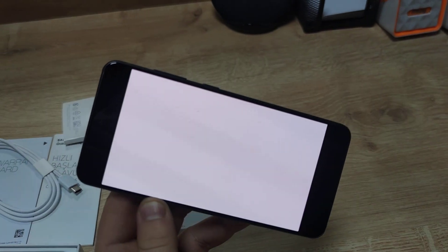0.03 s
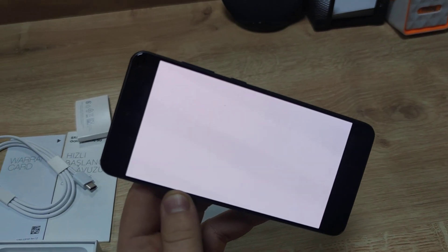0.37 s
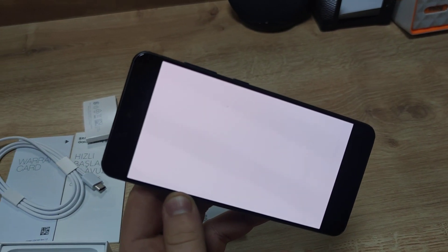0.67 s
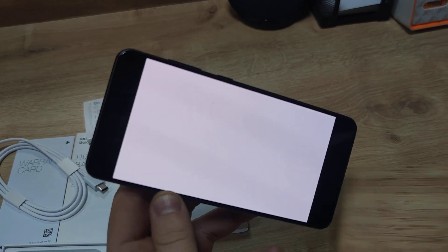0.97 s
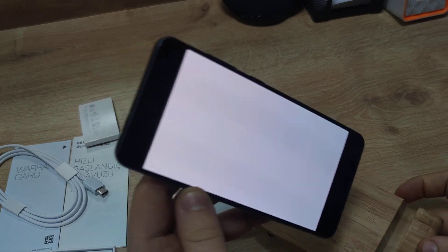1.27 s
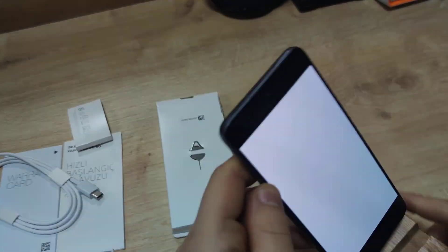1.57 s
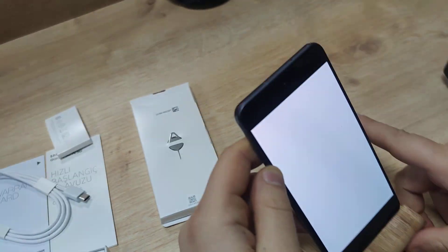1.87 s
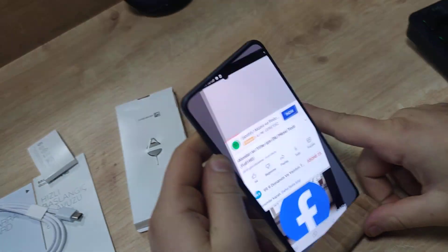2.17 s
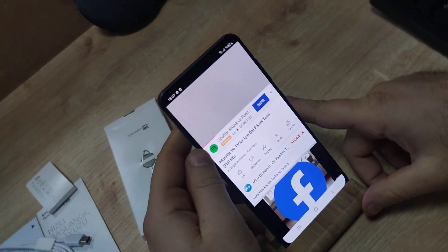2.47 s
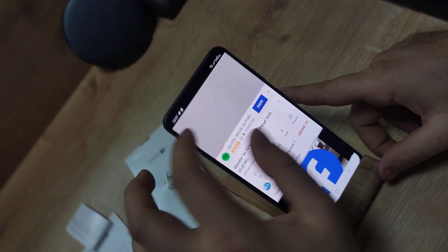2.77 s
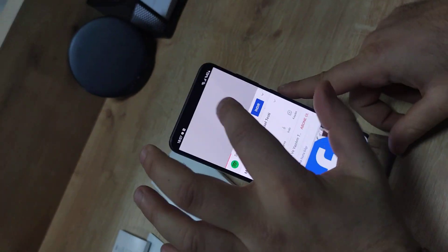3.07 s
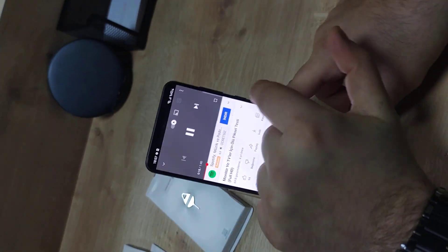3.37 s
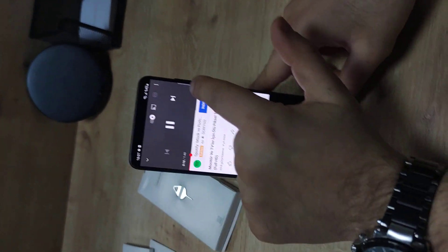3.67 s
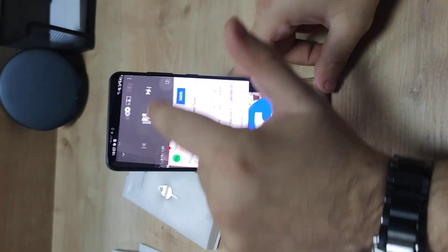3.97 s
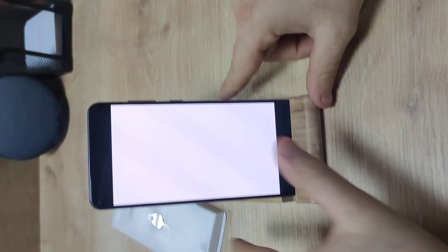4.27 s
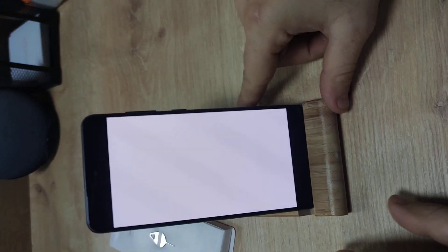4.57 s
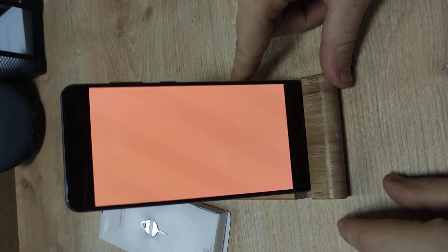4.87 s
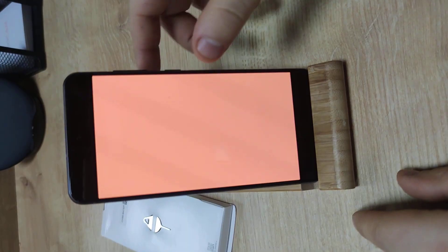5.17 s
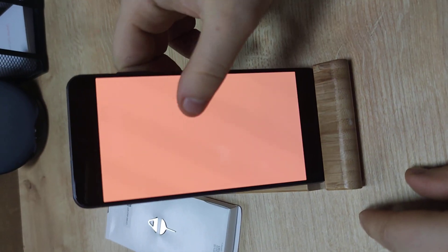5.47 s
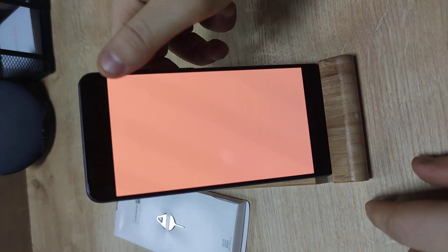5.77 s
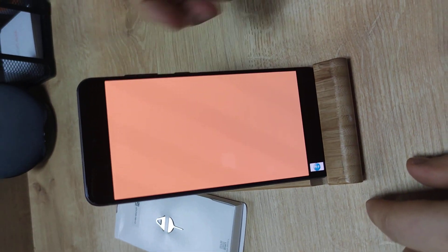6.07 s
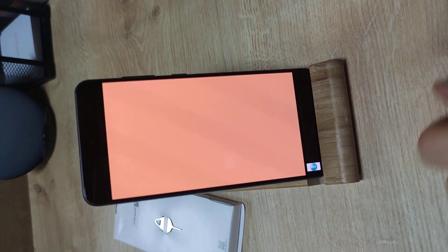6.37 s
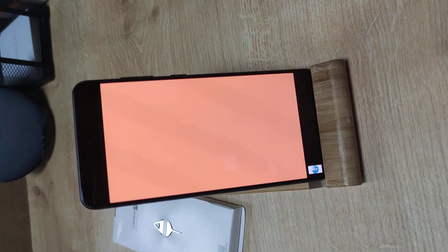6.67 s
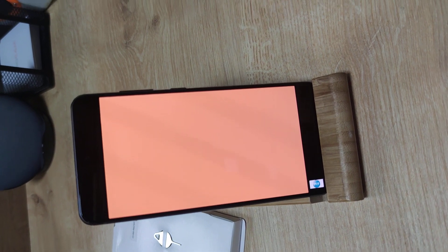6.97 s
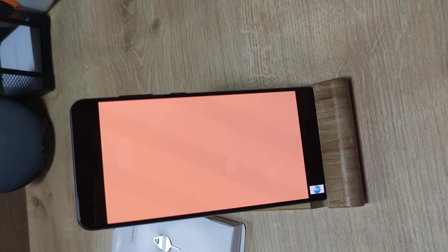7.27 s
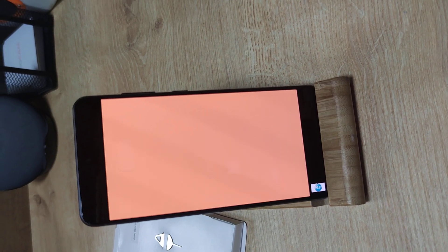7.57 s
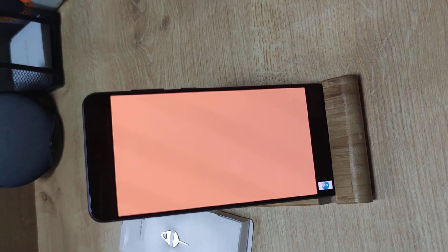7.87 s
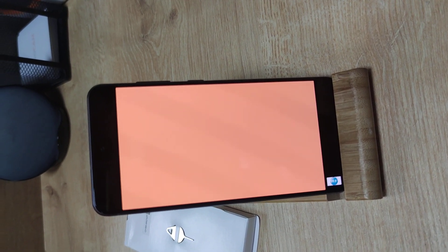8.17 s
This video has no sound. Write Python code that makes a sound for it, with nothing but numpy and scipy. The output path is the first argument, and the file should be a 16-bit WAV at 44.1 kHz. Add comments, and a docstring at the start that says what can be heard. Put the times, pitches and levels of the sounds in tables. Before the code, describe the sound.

Wooden knocks and clicks of a smartphone being set in a desk stand, followed by close bumps and rubbing from handling the microphone.

```python
"""Setting a phone in its stand

In a small room a wooden stand knocks onto a desk, a steel watch band jingles, and a
smartphone clicks into the stand. The hand holding the camera shifts its grip: skin hisses
over the casing, and a finger rubs the right microphone port and pumps the air inside it.
A sleeve brushes the desk as the hands withdraw. Still air and a faint whine lie underneath."""
import sys
import numpy as np
from scipy import signal
from scipy.fft import rfft, irfft
from scipy.io import wavfile
from scipy.ndimage import uniform_filter1d

SR = 44100
rng = np.random.default_rng(int(sys.argv[2]) if len(sys.argv) > 2 else 0)


def int16_out(signal):
    """Quantize to a 16-bit WAV file."""
    q = np.round(np.clip(np.atleast_2d(signal).T, -1, 1) * 32767)
    wavfile.write(sys.argv[1], SR, q.astype(np.int16))


N = 371272
T = np.arange(N) / SR

# The room's still air. Each row: frequency in Hz, level in dB.
AIR_SPECTRUM = [(12, -42.5), (20, 3), (45, -3.5), (91, -14.5), (216, -20.5), (285, -16.5), (319, -15.5),
                (399, -17.5), (642, -29), (698, -25.5), (1570, -35), (2530, -32), (2990, -39),
                (13500, -46.5), (16000, -42)]
# Electronic whine on the left. Each row: pitch in Hz, level in dB.
WHINE_PARTIALS = [(2272, -72.5), (4544, -79)]
# The hand's slide over the casing. Each row: time in seconds, left and right levels in dB.
SLIDE_LEVELS = [(0, -64, -74), (1.4, -65, -83), (1.8, -54.5, -54), (2.4, -61, -65), (3.0, -53.5, -52),
                (3.76, -65, -80.5), (3.88, -58.5, -51), (4.15, -51.5, -47.5), (4.42, -44, -39.5),
                (4.69, -42.5, -49), (4.715, -40, -36), (4.96, -52.5, -43.5), (5.15, -48.5, -37),
                (5.45, -55, -51), (5.68, -61, -49.5), (5.9, -66.5, -61), (6.4, -57, -52),
                (6.75, -70.5, -62), (7.06, -61.5, -55), (7.4, -71, -64), (8.42, -66.5, -60)]
# Sliding skin as each port colours it. Each row: frequency in Hz, level in dB.
LEFT_PORT_SPECTRUM = [(40, 14), (200, -15.5), (600, -1), (2300, -5), (4000, -11.5), (6500, -10.5),
                      (7500, -3), (8100, 1.5), (8900, -7.5), (11000, -15.5), (16000, -22)]
RIGHT_PORT_SPECTRUM = [(30, 25), (100, 2), (300, -3), (700, -1), (2400, -5), (3400, -15), (6000, -11),
                       (8000, -68), (10500, -18), (12500, -5), (13700, -1.5), (16000, -16)]
# Light taps near the left port. Each row: time in seconds, level in dB, pulse width in ms.
CASING_TAPS = [(2.5176, -23.5, 0.13), (3.072, -26, 0.49), (7.2375, -18, 3.15)]
# Cloth on wood. Each row: frequency in Hz, level in dB.
CLOTH_SPECTRUM = [(40, -18), (90, 5.5), (130, -8), (200, 17), (300, 2), (800, 0.5), (1100, -0.5),
                  (1550, -2), (2700, -2), (3500, -16), (6000, -17.5), (8500, -19), (11000, -45),
                  (16000, -37)]
# Sleeve sweeps. Each row: start, hold and 60 dB fade time in seconds, level and treble in dB.
SLEEVE_SWEEPS = [(0, 0.034, 0.41, -47.5, -11), (1.633, 0.44, 3.2, -53.5, 4),
                 (6.06, 0.061, 0.3, -65.5, 11.5), (6.441, 0.034, 0.47, -44.5, 14),
                 (6.504, 0.015, 0.24, -37.5, 0.5), (6.898, 0.05, 0.094, -50, 4.5),
                 (6.942, 0.035, 0.042, -43.5, -2.5)]
# Fingers and objects sliding. Each row: centre time in seconds, level in dB, length in seconds,
# resonance and its width in Hz, left minus right in dB.
SHORT_SLIDES = [(.03, -62.5, .08, 190, 118, 1), (1.071, -47, 0.065, 7250, 2980, 9),
                (1.033, -42.5, 0.017, 1786, 2010, 1), (1.074, -30, 0.015, 2290, 2500, -4),
                (1.087, -33.5, 0.032, 1040, 200, -1), (2.766, -54.5, 0.026, 6480, 4000, -18),
                (2.879, -62, 0.1, 6160, 4000, -19), (3.058, -44, 0.016, 2420, 1800, -32.5),
                (4.749, -60, 0.094, 2240, 1710, -12), (4.357, -51, 0.28, 190, 200, -3),
                (4.419, -59.5, 0.38, 1870, 1310, -13), (4.748, -50.5, 0.12, 5600, 4000, 3),
                (5.224, -52, 0.043, 1220, 700, 3), (6.019, -53.5, 0.044, 230, 298, 3),
                (6.086, -51.5, 0.049, 1360, 594, -2), (6.513, -47.5, 0.12, 89, 50, 4),
                (6.56, -49, 0.26, 190, 70, 0), (6.53, -43, .03, 2200, 1800, -1),
                (6.952, -50.5, .006, 7360, 5000, 11), (6.955, -38, 0.036, 756, 448, -1.5)]
# Knocks on stand and desk. Each row: start in seconds, level in dB, contact cut-off in Hz,
# thud and click trims in dB.
STAND_KNOCKS = [(0.166, -34.5, 2180, 0.5, -3), (1.127, -2, 1800, -13, -19.5), (1.217, -23, 1470, -24, -39),
                (1.336, -51.5, 200, 3, -41), (1.5177, -11, 3050, -17, -9.5), (1.54, -18.5, 2500, -9, -17),
                (1.635, -25, 1760, -10, -18), (1.684, -37.5, 1500, 2.5, -19), (1.738, -29.5, 2200, -3, -18),
                (1.785, -35.5, 1200, -2, -18), (1.742, -17, 2430, -23.5, -14.5),
                (1.837, -34.5, 1580, 0, -9), (1.862, -32, 1300, -6, -31), (1.896, -34, 2000, -3, -15),
                (1.919, -25, 1800, -12.5, -13.5), (2.0167, -16, 2840, -36.5, -16),
                (2.0586, -12, 2920, -17, 7), (2.064, -19, 3530, -2.5, 8.5), (2.078, -20.5, 1980, 4, -3)]
# A knock's wooden body, desk thud and hard click. Each row: frequency in Hz, level in dB.
WOOD_SPECTRUM = [(60, -28.5), (150, -9.5), (300, -1), (500, -6), (750, 5.5), (1100, -1.5), (1400, -6),
                 (1750, 0.5), (2650, -9.5), (3200, -18.5), (6000, -37), (16000, -48)]
THUD_SPECTRUM = [(30, -25.5), (70, -11), (110, -6), (240, -6), (360, -1.5), (500, -12.5), (900, -42),
                 (16000, -67)]
CLICK_SPECTRUM = [(300, -34), (2000, 9.5), (3300, 6), (4300, 0), (5500, -1.5), (8300, -10), (9600, -28),
                  (16000, -36)]
# The ring of stand and desk, and of the phone's frame.
# Each row: pitch in Hz, level in dB, 60 dB decay time in seconds.
STAND_MODES = [(243, -11, .06), (357, -13.5, 0.36), (450, -15, 0.075), (562, 19, 0.023), (643, 5, 0.12),
               (712, 0.5, .12), (830, 11, 0.035), (1064, -7, 0.17), (1454, 6, 0.028), (1470, -19.5, 0.069),
               (1700, -12, 0.19), (1950, -13.5, 0.014), (2236, -7, 0.013), (2560, 1, 0.06)]
PHONE_MODES = [(2540, -2, 0.068), (3040, 3, 0.059), (4120, 7, 0.03), (5220, -8, 0.035), (5680, -22, 0.032)]
# Watch band jingles. Each row: start in seconds, level in dB, clasp trim in dB.
BAND_JINGLES = [(1.029, -37.5, 8.5), (1.046, -20, -12.5), (1.0607, -25.5, -2), (1.065, -23.5, -8),
                (1.07, -23.5, -3.5), (1.0848, -27, -8.5)]
# The tick of one link. Each row: frequency in Hz, level in dB.
TICK_SPECTRUM = [(700, -7.5), (1200, -20), (2400, -8), (4000, -7.5), (5600, -8), (7400, 7), (9000, -1.5),
                 (11000, -10), (16000, -28)]
# The ring of links and clasp. Each row: pitch in Hz, level in dB, 60 dB decay time in seconds.
BAND_LINK_MODES = [(6740, 6.5, 0.038), (7240, 7, 0.045), (7260, -5, .1), (7440, -6, 0.049),
                   (7800, 5, 0.045), (8200, -20, .03), (13200, -2, 0.024)]
BAND_CLASP_MODES = [(1100, 3, 0.079), (1475, -16, 0.022), (2050, -14, .015), (2280, 14, .025),
                    (2750, -25, 0.011), (3800, -24, 0.011)]
# Skin rubbing the covered port. Each row: frequency in Hz, level in dB.
SKIN_SPECTRUM = [(25, 6), (100, 9), (300, 2.5), (700, -3), (1500, -7), (2600, -12), (3500, -18.5),
                 (6200, -19.5), (7800, -37.5), (10000, -35.5), (13000, -26.5), (16000, -35.5)]
# Rubs across the right port. Each row: start, length and attack in seconds, level in dB,
# opening and closing gain of each treble shelf in dB.
PORT_RUBS = [(2.542, 0.93, 0.014, -63, 14, 9), (2.914, 0.073, 0.033, -31.5, 15, 11.5),
             (2.973, 0.088, 0.013, -22.5, 8, -4), (3.105, 0.0855, 0.011, -14.5, 4.5, -1.5),
             (3.304, 0.066, 0.0025, -18.5, -2.5, -1.5), (3.429, 0.03, 0.0088, -36, -14, -28)]
# The resting finger creeps between rubs. Each row: time in seconds, level in dB.
CREEP_LEVELS = [(2.85, -68), (3.08, -44), (3.3, -48), (3.74, -56), (3.82, -93)]
# Fingertip bumps on the right port. Each row: time in seconds, "press" or "lift", level in dB,
# pulse width in ms, grit trim in dB, contact in ms, air pocket pitch in Hz, its ring trim in dB.
PORT_BUMPS = [(2.768, "lift", -36.5, 2.5, -10.5, 7.8, 180, -12),
              (3.067, "press", -15, 1.5, -27, 12, 300, -11),
              (3.0893, "press", -10.5, 0.11, -17, 6, 190, -2), (3.098, "press", -11, 3.5, -30, 14, 190, 0),
              (3.107, "press", -1, 0.61, -19, 3.3, 600, -15),
              (3.2131, "lift", -15.5, 0.48, -24, 8, 360, -5),
              (3.2183, "press", -1, 0.37, -26.5, 14, 1020, -24),
              (3.223, "lift", -4.5, 0.58, -33, 14.6, 180, -7),
              (3.256, "press", -3, 0.28, -22.5, 7.2, 304, -2),
              (3.2906, "press", -5, 0.45, -16, 3.6, 282, 1),
              (3.3086, "lift", 0.5, 0.32, -20, 3.2, 1400, -13.5),
              (3.319, "lift", -9, 0.94, -21, 5, 378, -3), (3.3643, "press", -5, 0.81, -49, 10, 315, -7),
              (3.4697, "lift", -1, 0.4, -24, 10.5, 430, -11.5),
              (3.473, "lift", -0.5, 0.5, -27, 11, 381, -2),
              (3.5256, "press", -30.5, 1, -4.5, 1.9, 220, -12),
              (3.557, "lift", -25.5, 0.35, -10.5, 3.2, 700, -17),
              (3.5642, "lift", -11.5, 0.76, -27, 1.94, 400, -24),
              (3.6046, "lift", -17, .54, -12, 8.9, 277, 4),
              (3.6129, "lift", -13.5, 0.64, -33, 2.5, 370, -15),
              (3.624, "lift", 0.5, 0.58, -20.5, 5.3, 1070, -13),
              (3.692, "lift", -27.5, .2, -2.5, 3.1, 580, 1),
              (3.7018, "lift", -6.5, 1.2, -16, 4.9, 310, -4.5),
              (3.707, "lift", -1.5, 1.22, -24.5, 13.2, 520, -6.5),
              (3.7364, "lift", -8, 1, -26, 3.9, 316, -5.5),
              (3.843, "press", -31.5, 0.17, -11.5, 9.9, 650, -10),
              (3.868, "press", -28, 2.5, -19.5, 17, 1110, -10),
              (3.998, "press", -13.5, 0.49, -35, 5.5, 350, 0.5),
              (4.0021, "press", -12, 2.2, -33, 6.5, 580, -2.5),
              (4.0197, "press", -21.5, 0.093, -26, 15, 174, -3),
              (4.2282, "press", -15, 0.22, -18.5, 1.7, 330, -11.5),
              (4.3982, "press", -20, .76, -13.5, 6.6, 970, -8),
              (4.583, "press", -16.5, 0.21, -12, 2.6, 340, 1.5),
              (4.602, "lift", -6, 1.2, -9.5, 4.5, 475, -7), (4.6116, "lift", 1, 1.7, -26, 8.4, 557, -11),
              (4.8902, "press", -26.5, 1.2, -17, 6.5, 179, -9),
              (5.1447, "press", -27, .1, -6, 9.1, 500, -6),
              (5.1509, "lift", -3.5, 0.046, -35.5, 8.6, 248, -30),
              (5.348, "press", -17, 0.15, -3, 2.2, 1400, -27),
              (5.3605, "lift", .5, 0.62, -29, 10.7, 255, -11.5),
              (5.4186, "press", -27, 0.33, 0.5, 5.9, 800, -22),
              (5.424, "lift", -.5, .61, -36.5, 10, 547, -18),
              (5.5423, "press", -35, 1.5, -11.5, 5.9, 300, -14),
              (5.6222, "press", -36.5, 0.089, -10.5, 10, 756, -1)]


def undb(db):
    """Decibels to gain."""
    return 10 ** (np.asarray(db) / 20)


def unit(x):
    """Scale to rms 1."""
    return x / np.sqrt(np.mean(x ** 2))


def curves(rows):
    """Each column of a table as a line through time."""
    times, *columns = np.transpose(rows)
    return [np.interp(T, times, column) for column in columns]


def add(out, start_s, x):
    """Mix x in at start_s."""
    i = max(int(start_s * SR), 0)
    out[..., i:i + x.shape[-1]] += x[..., :N - i]


def colour(x, spectrum, size=4096):
    """Minimum-phase EQ of unit energy, drawn through (Hz, dB) points."""
    hz, db = np.transpose(spectrum)
    bins_hz = np.maximum(np.arange(size // 2 + 1) * SR / size, 1)
    gains = undb(np.interp(np.log(bins_hz), np.log(hz), db))
    cepstrum = irfft(np.log(gains))
    cepstrum[1:size // 2] *= 2
    cepstrum[size // 2 + 1:] = 0
    impulse = irfft(np.exp(rfft(cepstrum)))
    impulse /= np.linalg.norm(impulse)
    return np.apply_along_axis(lambda row: signal.oaconvolve(row, impulse)[:len(row)], -1, x)


def cut(x, hz, kind, order=2):
    """Low-pass or high-pass."""
    return signal.sosfilt(signal.butter(order, hz, kind, fs=SR, output="sos"), x)


def brighten(x, treble_db, hz):
    """A gentle treble shelf above hz."""
    low = cut(x, hz, "low", order=1)
    return low + undb(treble_db) * (x - low)


def wander(rate_hz):
    """Smooth random drift of rms 1."""
    step = int(SR / rate_hz)
    stairs = np.repeat(rng.standard_normal(N // step + 1), step)
    return unit(uniform_filter1d(stairs, step)[:N])


def friction(spectrum, grain_db, flutter_db):
    """Countless tiny slips of uneven size, coloured by the body they rub."""
    slips = rng.standard_normal(N) * undb(grain_db * wander(1500) + flutter_db * wander(45))
    return unit(colour(slips, spectrum))


def ring(modes, t, detune):
    """Decaying modes; grip and point of contact vary their pitch and mix from blow to blow."""
    hz, db, t60 = np.transpose(modes)[:, :, None]
    hz = hz * (1 + detune * rng.standard_normal(hz.shape))
    signs = rng.choice([-1, 1], (2, len(modes)))
    gains = signs * undb(db.T + 2 * rng.standard_normal(signs.shape))
    gains /= np.linalg.norm(gains, axis=1, keepdims=True)
    return gains @ (undb(-60 * t / t60) * np.sin(2 * np.pi * hz * t))


def clatter(t, t60):
    """A blow scattered by the desk and the things on it, different at each port."""
    return rng.standard_normal((2, len(t))) * undb(-60 * t / t60)


def room_tone(left_db=-52.5, right_db=-50.5):
    """A bed of air and rumble with a faint electronic whine, which fades in late on the right."""
    air = np.array([unit(colour(rng.standard_normal(N), AIR_SPECTRUM)) * undb(0.9 * wander(6.7))
                    for _ in range(2)])
    left_whine = sum(undb(db) * np.sin(2 * np.pi * hz * T) for hz, db in WHINE_PARTIALS)
    right_whine = undb(-67.5) * np.sin(2 * np.pi * 2555 * T) * np.clip(T - 5, 0, 1)
    return air * undb([[left_db], [right_db]]) + np.array([left_whine, right_whine])


def pressure_pulse(t, width_ms):
    """A short swell of pressure, centred on t = 0."""
    return 1 / np.cosh(np.clip(1000 * t / width_ms, -50, 50))


def hand_on_casing():
    """Sliding skin hisses through each port's resonance; fingers tap lightly near the left one."""
    left_db, right_db = curves(SLIDE_LEVELS)
    left = undb(left_db) * friction(LEFT_PORT_SPECTRUM, grain_db=1.5, flutter_db=1.1)
    right = undb(right_db) * friction(RIGHT_PORT_SPECTRUM, grain_db=3.0, flutter_db=1.7)
    taps, lead = np.zeros(N), SR // 64
    t = T[:2 * lead] - T[lead]
    for time_s, db, width_ms in CASING_TAPS:
        add(taps, time_s - T[lead], undb(db) * pressure_pulse(t, width_ms))
    return np.array([left + cut(taps, 102, "high"), right])


def sleeve(attack_s=0.012, right_db=1):
    """Cloth and skin brush the desk: each sweep swells, holds and dies away."""
    cloth = np.array([friction(CLOTH_SPECTRUM, grain_db=3.0, flutter_db=2.5) for _ in range(2)])
    out = np.zeros((2, N))
    for start_s, hold_s, t60, db, treble_db in SLEEVE_SWEEPS:
        swell = np.clip((T - start_s) / attack_s, 0, 1)
        fade = undb(-60 * np.maximum(T - start_s - hold_s, 0) / t60)
        out += undb(db) * swell * fade * brighten(cloth, treble_db, hz=1440)
    return out * undb([[0], [right_db]])


def short_slides(lead_s=0.5):
    """Brief rasps swell and fade, each exciting one broad resonance of the thing being rubbed."""
    out, t = np.zeros((2, N)), T[:SR] - lead_s
    grain = undb(1.7 * wander(1200)[:SR])
    for centre_s, db, length_s, hz, width_hz, pan_db in SHORT_SLIDES:
        resonance = signal.iirpeak(hz, hz / width_hz, fs=SR)
        slips = grain * rng.standard_normal((2, SR))
        rasp = unit(signal.lfilter(*resonance, signal.lfilter(*resonance, slips)))
        swell = np.exp(-(2 * t / length_s) ** 2)
        pan = undb([[pan_db / 2], [-pan_db / 2]])
        add(out, centre_s - lead_s, undb(db) * rasp * swell * pan)
    return out


def stand_knocks(direct_db=11, scatter_db=-7, modes_db=-7, frame_db=-21, wood_top_hz=6000):
    """A blow rings the stand and thuds in the desk top; its hard click rings the phone's frame."""
    out, t = np.zeros((2, N)), T[:SR // 5]
    for start_s, db, contact_hz, thud_db, click_db in STAND_KNOCKS:
        blow = undb(scatter_db) * clatter(t, t60=0.062)
        blow[:, 0] += undb(direct_db)
        body = colour(blow, WOOD_SPECTRUM) + undb(modes_db) * ring(STAND_MODES, t, detune=0.0022)
        body = cut(body, contact_hz, "low", order=1)  # a softer contact pushes longer, sounds duller
        body = cut(body, wood_top_hz, "low", order=3)  # the wood swallows the top
        thud = undb(thud_db - 2.5) * colour(clatter(t, t60=0.12), THUD_SPECTRUM)
        click = undb(click_db - 9.5) * colour(clatter(t, t60=0.044), CLICK_SPECTRUM)
        frame = undb(click_db + frame_db) * ring(PHONE_MODES, t, detune=0.002)
        add(out, start_s, undb(db) * (body + thud + click + frame))
    return out


def watch_band(tick_db=-4, links_db=-11, clasp_db=-10, right_db=2):
    """Small steel links scrape together, no two alike, and ring the clasp."""
    out, t = np.zeros((2, N)), T[:SR // 4]
    for start_s, db, clasp_trim_db in BAND_JINGLES:
        tick = undb(tick_db) * colour(clatter(t, t60=0.021), TICK_SPECTRUM)
        links = undb(links_db) * ring(BAND_LINK_MODES, t, detune=0.009)
        clasp = undb(clasp_db + clasp_trim_db) * ring(BAND_CLASP_MODES, t, detune=0.046)
        add(out, start_s, undb(db) * (tick + links + clasp))
    return out * undb([[0], [right_db]])


def finger_rubs(release_s=0.008, arch_db=7):
    """Skin creeps and rubs over the right port; most strokes darken as the finger presses down."""
    skin = friction(SKIN_SPECTRUM, grain_db=1.0, flutter_db=1.5)
    out = skin * undb(curves(CREEP_LEVELS)[0])
    for start_s, length_s, attack_s, db, opening_db, closing_db in PORT_RUBS:
        t = T[:int(length_s * SR)]
        progress = t / length_s
        touch = np.clip(np.minimum(t / attack_s, (length_s - t) / release_s), 0, 1)
        arch = undb(-arch_db * (2 * progress - 1) ** 2)  # strongest mid-stroke
        # a light, fast stroke is brighter than a pressed one: two shelves tilt the spectrum
        treble_db = opening_db + (closing_db - opening_db) * progress
        rub = skin[int(start_s * SR):][:len(t)]
        for shelf_hz in (1320, 5430):
            rub = brighten(rub, treble_db, shelf_hz)
        add(out, start_s, undb(db) * rub * touch * arch)
    return out


def finger_bumps(leak_hz=30, rebound_db=-6, pocket_t60=0.019, grit_db=6):
    """The fingertip pumps the air in the right port; skin drags for a moment around each bump."""
    pressure, grip, lead = np.zeros(N), np.zeros(N), SR // 64
    t = T[:4 * lead] - T[lead]
    after = np.maximum(t, 0)
    for time_s, move, db, width_ms, grit_trim_db, contact_ms, pocket_hz, ring_db in PORT_BUMPS:
        polarity = 1 if move == "press" else -1
        progress = 1000 * t / contact_ms
        pulse = pressure_pulse(t, width_ms)
        # the soft fingertip springs back and returns part of the air it moved
        give = np.sin(np.pi * np.clip(progress, 0, 1))
        rebound = undb(rebound_db) * give * pulse.sum() / give.sum()
        # the air pocket under the fingertip adds a brief hollow ring
        pocket = undb(ring_db - 60 * after / pocket_t60) * np.sin(2 * np.pi * pocket_hz * after)
        add(pressure, time_s - T[lead], polarity * undb(db) * (pulse - rebound - pocket))
        drag = np.where(t < 0, pressure_pulse(t, width_ms=1.0), np.exp(-progress ** 4))
        add(grip, time_s - T[lead], undb(db + grit_trim_db) * drag)
    thumps = cut(pressure, leak_hz, "high")  # air leaks past the finger, so every pulse swings back
    skin = friction(SKIN_SPECTRUM, grain_db=4.0, flutter_db=-0.5)
    grit = grip * brighten(skin, treble_db=-5, hz=2900)
    return thumps + undb(grit_db) * grit


def small_room(x, wet_db=-8, t60=0.51, treble_t60=0.23, split_hz=4500, build_s=0.0024):
    """Close walls add a short reverb whose treble dies first."""
    t = T[:SR]
    reflections = rng.standard_normal((2, SR)) * (1 - np.exp(-t / build_s))
    low = cut(reflections, split_hz, "low", order=1)
    decay = undb(-60 * t / t60)
    tail = low * decay + (reflections - low) * undb(-60 * t / treble_t60)
    tail /= np.linalg.norm(reflections * decay, axis=1, keepdims=True)
    return x + undb(wet_db) * signal.fftconvolve(x, tail, axes=1)[:, :N]


def scene():
    """Desk sounds ring in the room; hand and finger stay dry, right at the ports."""
    desk = stand_knocks() + watch_band() + sleeve() + short_slides()
    out = small_room(desk) + hand_on_casing() + room_tone()
    out[1] += finger_bumps() + finger_rubs()
    return out


def record(dry, ceiling=0.9, top_hz=16100):
    """Clip the hardest hits, then cut the top end steeply."""
    clipped = np.clip(dry, -ceiling, ceiling)
    return signal.sosfilt(signal.ellip(10, .1, 80, top_hz, fs=SR, output="sos"), clipped)


dry = scene()
out = record(dry)
int16_out(out)
```